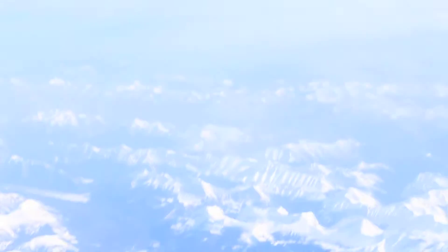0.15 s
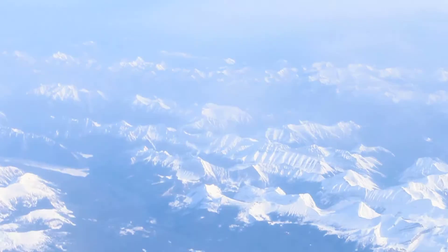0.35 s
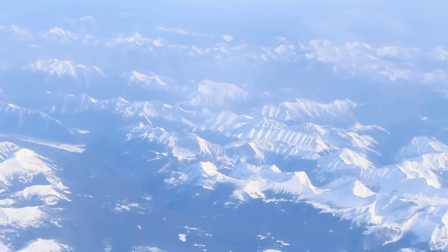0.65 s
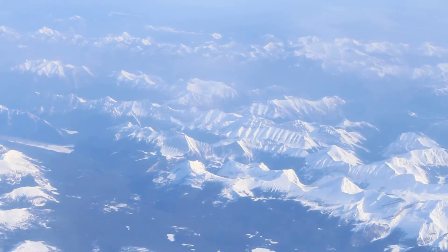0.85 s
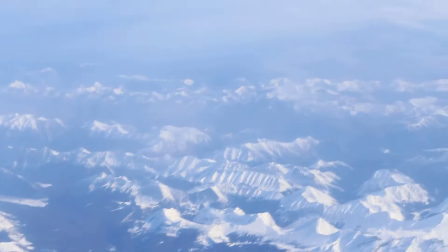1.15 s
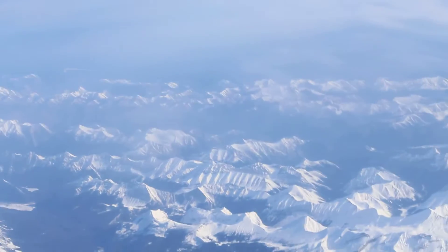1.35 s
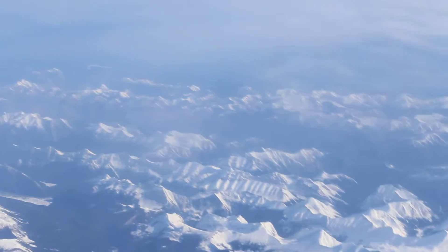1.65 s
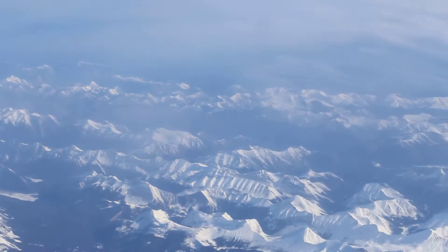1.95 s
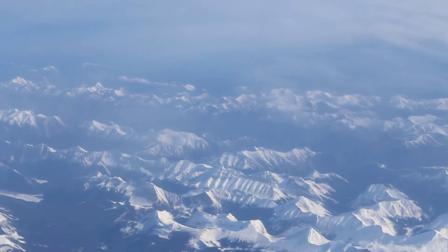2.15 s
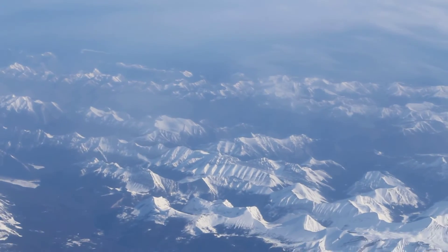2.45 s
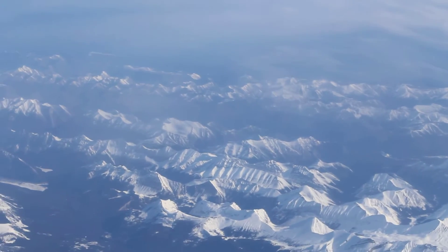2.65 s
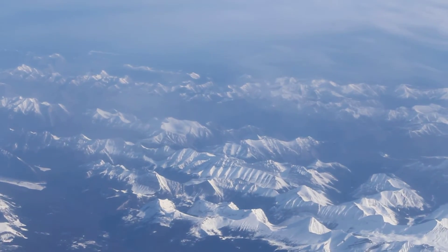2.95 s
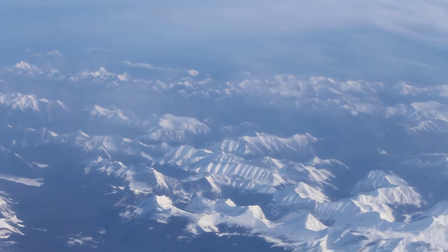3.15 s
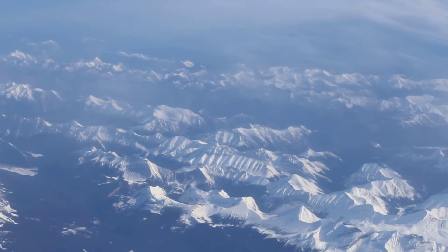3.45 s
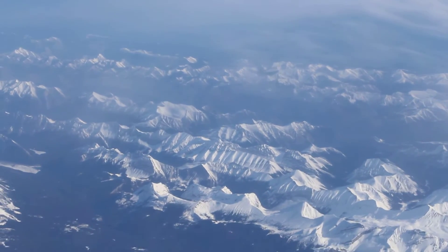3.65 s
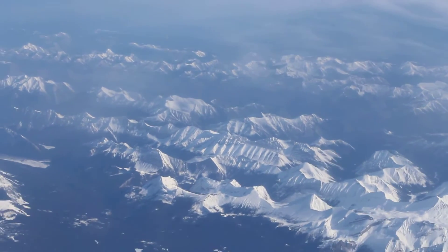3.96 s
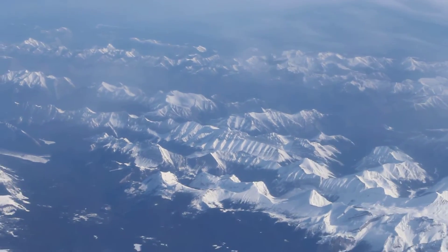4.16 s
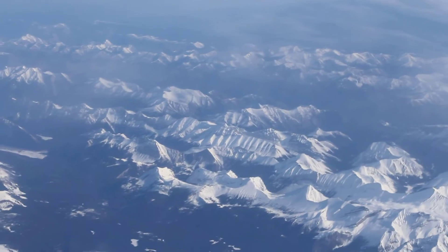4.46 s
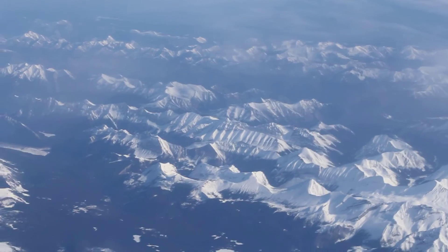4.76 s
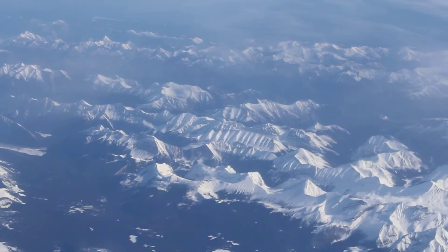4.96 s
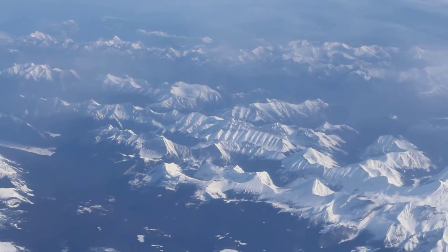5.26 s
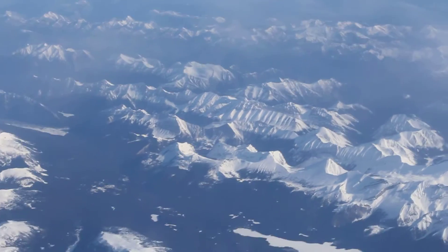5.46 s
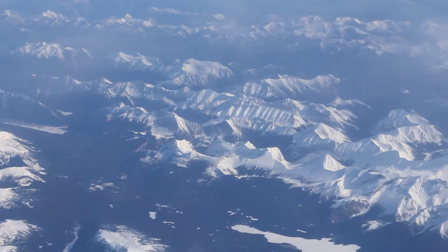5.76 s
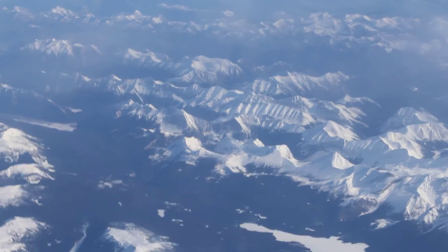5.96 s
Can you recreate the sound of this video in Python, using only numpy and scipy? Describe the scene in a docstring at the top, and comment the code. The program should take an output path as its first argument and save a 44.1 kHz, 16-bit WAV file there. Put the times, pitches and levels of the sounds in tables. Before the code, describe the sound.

Loud steady roar of jet engines and airflow inside an airliner cabin, with faint hand rubbing and taps on the microphone.

```python
"""Airliner cabin with a hand on the camera

At a window seat in cruise, airflow and engines roar through the wall over a faint low hum and the
hiss of the vents. A hand shifts its grip on the camera: skin slides and squeaks on the case, fingers
knock it, and one briefly covers the microphone opening. Two soft low bumps are heard too."""
import sys
import numpy as np
from scipy import signal
from scipy.fft import rfft, irfft
from scipy.io import wavfile
from scipy.ndimage import uniform_filter1d

SR = 44100
rng = np.random.default_rng(int(sys.argv[2]) if len(sys.argv) > 2 else 0)


def master_out(mix):
    """Clip the mix to full scale and print it as 16-bit PCM to the path in sys.argv[1]."""
    frames = np.transpose(np.atleast_2d(mix))
    ceiling = np.clip(frames, -1, 1)
    pcm = np.round(ceiling * 32767).astype(np.int16)
    wavfile.write(sys.argv[1], SR, pcm)


N = 268993
T = np.arange(N) / SR
HZ = np.fft.rfftfreq(N, 1 / SR)

# pitches that the camera case boosts or weakens: f/Hz, width/Hz, boost/dB
CASE_RESONANCES = [(3210, 510, 4), (3700, 430, 0), (5500, 250, -0.5), (6220, 320, -1.5), (7850, 300, -1.5),
                   (10300, 400, -3.5)]


def roar(swell_db, flutter_db, level_db=-14, split_hz=420):
    """Rushing air and engines shake the wall and make the cabin ring; the bass stays steadiest."""
    # tone of the noise through the wall: f/Hz, relative level/dB
    spectrum = [(20, -37), (30, -31.5), (38, -25.5), (60, -25), (72, -18), (110, -13.5), (145, -1),
                (210, -5), (330, -4), (430, -12.5), (760, -19.5), (1150, -27.5), (1700, -38.5), (3000, -49)]
    # resonances of the cabin and its panels: f/Hz, width/Hz, boost/dB
    resonances = [(161, 46, 1), (271.6, 29.3, 4), (326, 4, -1.5), (402, 20, -4.5), (447, 26, -3),
                  (527, 17, 3), (578.6, 24, 5), (765, 41, 3.5), (1437, 55, 3.5), (2090, 250, 2)]
    noise = amp(level_db) * colour(rng.standard_normal(N), shape(spectrum, resonances))
    bass = below(noise, split_hz)
    return bass * amp(0.18 * swell_db) + (noise - bass) * amp(1.09 * swell_db + flutter_db)


def airflow():
    """The uneven airflow makes the level swell slowly and flutter quickly; gives both in dB."""
    # the slow swell: t/s, relative level/dB
    swell_points = [(0, 0.5), (.35, 0.5), (.65, -0.8), (1, 2), (1.15, -0.1), (1.4, 2), (1.7, -2), (2, 2),
                    (2.2, -3), (2.5, -0.8), (4, 0.4), (4.598, -0.7), (5.6, 0.1), (6.05, -0.6)]
    times, db = np.transpose(swell_points)
    swell_db = np.interp(T, times, db - db.mean())
    gusts = drift(rate_hz=8.4)
    flutter_db = 1.5 * (gusts - below(gusts, corner_hz=2.75))
    return swell_db, flutter_db


def skin_slides(slips_per_s=7000, spread_db=2, judder_db=0.94, grip_db=1.05):
    """Sliding skin catches and slips thousands of times a second, ringing the case; the grip wavers."""
    # hand strokes: start/s, fastest/s, end/s, rub/dB, fizz/dB, cupping/0-1, gap resonance/Hz,
    # finger pitch factor, upper resonance/Hz, its boost/dB, notch/Hz
    strokes = [ (0, 0.335, .43, -61, -70, 0.37, 3250, 1, 15000, 2, 9800),
               (0, .6, 1.2, -56, -70, 0.4, 3250, 1, 10900, 13, 9900),
               (0.857, 0.94, 1.15, -38.5, -53.5, 0.2, 4440, 1.03, 6700, 7, 10100),
               (1.192, 1.214, 1.39, -39, -54, 0.75, 3270, 1.1, 7350, 9.5, 6450),
               (1.276, 1.425, 1.46, -38, -56, 0.9, 3450, 1, 8400, 4, 9900),
               (1.348, 1.535, 1.76, -41.5, -52.5, 0.6, 3530, 0.98, 13500, 9, 10300),
               (1.63, 1.832, 1.832, -40.5, -52.5, 0.7, 3800, 1.02, 7600, 3.5, 10900),
               (1.883, 1.908, 2.08, -37, -50.5, 0.4, 3940, 1.03, 7360, 8, 11000),
               (4.932, 5.056, 5.18, -36.5, -53, 0.44, 3800, 1.02, 5350, 6, 10700),
               (5.15, 5.295, 5.46, -41.5, -63, 0.8, 3740, 0.98, 7400, 3, 6400),
               (5.41, 5.5, 5.67, -37.3, -66, 1, 3760, 1.045, 11200, 7, 5000),
               (5.6, 5.693, 5.91, -41.5, -66, 0.9, 3760, 1.045, 5500, -1, 4950),
               (5.837, 5.935, 6.05, -45.5, -59, 0.1, 4470, 1.045, 8260, 10, 6600), ]
    # tone of the rubbing: f/Hz, relative level/dB
    rub_spectrum = [(600, 0), (1300, 7.5), (2100, -2), (2750, -7.5), (3200, -4), (4400, -2.5), (5500, -6),
                    (6300, -13), (8000, -22), (11000, -29.5)]
    # tone of its fine, high fizz: f/Hz, relative level/dB
    fizz_spectrum = [(3000, -22), (5000, -5), (7400, 2.5), (9200, -2.5), (10300, -0.5), (12400, -1),
                     (14000, -4), (16000, -11)]
    slips = (rng.random(N) < slips_per_s / SR) * rng.standard_normal(N)
    slips *= amp(spread_db * np.minimum(rng.exponential(1, N), 4))  # a few slips stand out
    rub = colour(slips, shape(rub_spectrum, CASE_RESONANCES))
    rub *= amp(judder_db * drift(rate_hz=59) + grip_db * drift(rate_hz=30))
    fizz = colour(slips * rng.choice([-1, 1], N), shape(fizz_spectrum, CASE_RESONANCES))
    out = np.zeros(N)
    for start, fastest, end, rub_db, fizz_db, *hand_shape in strokes:
        on = (T >= start) & (T < end)
        speed = np.sin(np.pi / 2 * np.interp(T[on], [start, fastest, end], [0, 1, 0]))
        friction = amp(rub_db) * rub[on] + amp(fizz_db) * fizz[on]
        out[on] += speed * hand_hollow(friction, *hand_shape)
    return out


def hand_hollow(x, cupping, gap_hz, finger_pitch, upper_hz, upper_db, notch_hz, ripple_db=1.5):
    """The air gap under the hand rings, more so when cupped, and rises in pitch as it closes."""
    # narrow peaks and dips between fully cupped fingers: f/Hz, width/Hz, boost/dB
    finger_gaps = [(4100, 150, -7), (4310, 130, 8.5), (4540, 120, -6), (4800, 160, 5.5), (5100, 150, -4),
                   (5400, 200, -0.5), (9050, 350, 6), (12100, 450, 6), (15400, 600, 10)]
    dip_hz = 0.76 * gap_hz
    resonances = [
        (gap_hz, 0.12 * gap_hz, 10 * cupping),
        (dip_hz, 0.07 * gap_hz, -8.5 * cupping),
        (upper_hz, 0.1 * upper_hz, upper_db),
        (notch_hz, 0.05 * notch_hz, -13),  # the echo off the palm cancels this pitch
    ]
    resonances += [(f * finger_pitch, width, cupping * db) for f, width, db in finger_gaps]
    hz, t, frames = signal.stft(x, SR, nperseg=512)
    glide = 1 + 0.1 * (t - t.mean())  # up by a tenth each second
    boost_db = sum(db * bell(hz[:, None], f * glide, width) for f, width, db in resonances)
    # fine resonances come and go as the skin folds
    ripple = uniform_filter1d(rng.standard_normal(frames.shape[::-1]), size=40, axis=0)
    ripple = unit(uniform_filter1d(ripple, size=3, axis=1).T)
    return signal.istft(frames * amp(boost_db + ripple_db * ripple), SR, nperseg=512)[1][:len(x)]


def finger_taps(thud_hz=300, thud_decay_s=0.015, ring_decay_s=0.0029):
    """Each tap on the case is a scuff, a ring and a low thud; a fingertip is dull, a nail crisp."""
    # taps: t/s, level/dB, rise/s, scuff decay/s, scuff top/Hz, scuff bottom/Hz,
    # thud against scuff/dB, ring/Hz, ring against scuff/dB
    hits = [ (.978, -32, .001, .006, 6000, 2500, -30, 4400, -6),
            (1.581, -34.5, .001, .005, 11000, 2500, -30, 4370, -8),
            (1.934, -32.5, .001, .005, 7000, 2500, -30, 4300, -8),
            (3.661, -21, 0.001, 0.0028, 3600, 700, -10, 3020, 0),
            (3.6655, -21.5, .0008, 0.0053, 2100, 700, -12, 1830, -12),
            (3.886, -36.5, 0.0013, 0.0052, 5200, 4300, -20, 6200, -6),
            (5.247, -23.5, .0014, 0.0048, 6800, 3600, -22, 3750, -8),
            (6.0605, -17.5, 0.0012, 0.0092, 8500, 400, 14.5, 3050, -13),
            (6.083, -13.5, 0.0028, 0.0069, 2600, 400, -18.5, 3030, -15), ]
    scuff_spectrum = [(400, 2), (1400, 2.5), (2300, -5.5), (4500, -7.5), (9000, -17), (16000, -5)]
    case = shape(scuff_spectrum, CASE_RESONANCES)
    out = np.zeros(N)
    for start, db, rise, decay, top_hz, bottom_hz, thud_db, ring_hz, ring_db in hits:
        age = np.maximum(T - start, 0)
        bass_cut = 1 - 1 / (1 + (HZ / bottom_hz) ** 8)
        noise = colour(rng.standard_normal(N), case * bass_cut)
        noise = signal.lfilter(*signal.butter(2, top_hz, fs=SR), noise)
        scuff = unit(noise) * np.exp(-age / decay)
        ring = amp(ring_db) * np.sin(2 * np.pi * ring_hz * age) * np.exp(-age / ring_decay_s)
        thud = amp(thud_db) * np.sin(2 * np.pi * thud_hz * age) * np.exp(-age / thud_decay_s)
        out += amp(db) * (1 - np.exp(-age / rise)) * (scuff + ring + thud)
    return out


def window_echo(x, delay_s=0.00163, echo_db=-11):
    """Sound bounces off the nearby window; the echo boosts some pitches and weakens others."""
    return irfft(rfft(x) * (1 + amp(echo_db) * np.exp(-2j * np.pi * HZ * delay_s)), N)


def low_bumps():
    """Two soft bumps, each a very short low tone."""
    # bumps: t/s, peak/dB, f/Hz, half-length/s, pitch waver/share of f
    bumps = [(1.630, -3.5, 250.3, 0.0066, 0.038), (4.884, -12, 133.8, 0.01, 0.025)]
    return blips(bumps)


def skin_squeaks():
    """Skin on the case gives tiny, high squeaks."""
    # squeaks: t/s, peak/dB, f/Hz, half-length/s, pitch waver/share of f
    squeaks = [(3.275, -53, 7500, 0.052, .05), (3.865, -41, 13500, .0055, .01),
               (3.886, -43, 10600, 0.0046, 0.0067)]
    return blips(squeaks)


def engine_hum(pitch_hz=49.1, level_db=-43.5, waver_hz=0.4, waver_db=2):
    """A slightly unbalanced engine shaft hums faintly through the body of the plane."""
    turns = np.cumsum(pitch_hz + waver_hz * drift(rate_hz=1.4)) / SR
    loudness = amp(level_db + waver_db * drift(rate_hz=1.5))
    return loudness * np.sqrt(2) * np.sin(2 * np.pi * turns)


def vent_hiss(swell_db, flutter_db, level_db=-50.5):
    """Air hisses out of the vents, swelling along with the roar."""
    # tone of the hiss: f/Hz, relative level/dB
    spectrum = [(1500, -11), (2700, -16), (3150, 0.5), (4200, -3.5), (5800, -5), (6600, -12), (7700, -10.5),
                (9000, -15.5), (11600, -18), (13500, -15.5), (16000, -16.5)]
    hiss = colour(rng.standard_normal(N), shape(spectrum))
    return hiss * amp(level_db + 0.81 * swell_db + flutter_db)


def blips(rows):
    """Brief tones that swell and fade, with unsteady pitch."""
    wander = np.cumsum(drift(rate_hz=450)) / SR
    out = np.zeros(N)
    for peak_s, db, hz, half_length, waver in rows:
        loudness = amp(db) * np.exp(-((T - peak_s) / half_length) ** 2)
        out += loudness * np.sin(2 * np.pi * hz * (T + waver * wander))
    return out


def amp(db):
    """Turns decibels into a factor to multiply by."""
    return 10 ** (np.asarray(db) / 20)


def unit(x):
    """Scales a signal to an average strength (rms) of 1."""
    return x / np.sqrt(np.mean(x ** 2) + 1e-20)


def bell(hz, centre, width):
    """A bell-shaped hill of height 1 around a frequency."""
    return np.exp(-2 * ((hz - centre) / width) ** 2)


def shape(points, resonances=()):
    """A tone curve through (f/Hz, level/dB) points, fading past both ends, with resonances on top."""
    hz, db = np.transpose(points)
    octave = np.log2(HZ + 1)
    octaves_outside = abs(octave - np.clip(octave, np.log2(hz[0]), np.log2(hz[-1])))
    slope_db = np.interp(octave, np.log2(hz), db) - 20 * octaves_outside
    return amp(slope_db + sum(boost * bell(HZ, f, width) for f, width, boost in resonances))


def colour(x, curve):
    """Filters a signal with a tone curve and scales it to strength 1."""
    return unit(irfft(rfft(x) * curve, N))


def drift(rate_hz):
    """A random wobble of strength 1, no faster than about the given rate."""
    return colour(rng.standard_normal(N), (HZ > 0) / (1 + (HZ / rate_hz) ** 4))


def below(x, corner_hz):
    """The part of a signal under a frequency."""
    return irfft(rfft(x) / (1 + (HZ / corner_hz) ** 8), N)


def scene():
    """The cabin and the hand together, in one channel."""
    hand = window_echo(skin_slides() + finger_taps()) + skin_squeaks()
    swell_db, flutter_db = airflow()
    cabin = roar(swell_db, flutter_db) + vent_hiss(swell_db, flutter_db) + engine_hum()
    return (cabin + hand + low_bumps())[None]


def record(dry, cover_at_s=1.829, tightest_at_s=1.861, seal_s=0.016, top_hz=16000):
    """A finger on the microphone opening cuts the treble and, pressed tight, dims the roar too."""
    touch_s, hold_s, lift_s = 0.002, 0.023, 0.028
    cover = np.interp(T, cover_at_s + np.cumsum([0, touch_s, hold_s, lift_s]), [0, 1, 1, 0])
    seal = np.exp(-((T - tightest_at_s) / seal_s) ** 2)
    lows, muffled = below(dry, corner_hz=2200), below(dry, corner_hz=5400)
    mids, treble = muffled - lows, dry - muffled
    heard = amp(-4.5 * seal) * (lows * amp(-11 * seal) + mids + treble * amp(-13 * cover))
    top_cut = signal.firwin(511, top_hz, window=("kaiser", 9), fs=SR)  # removes the highest treble
    return signal.oaconvolve(heard, top_cut[None], "same")


dry = scene()
out = record(dry)
master_out(out)
```